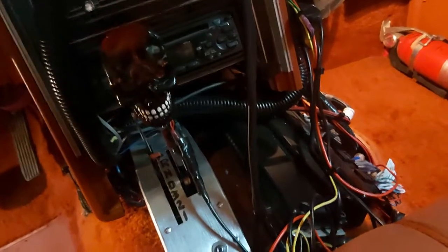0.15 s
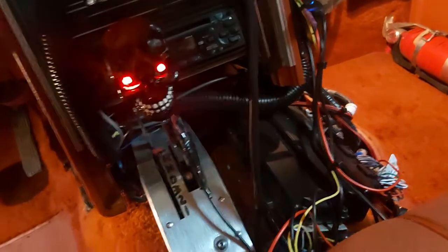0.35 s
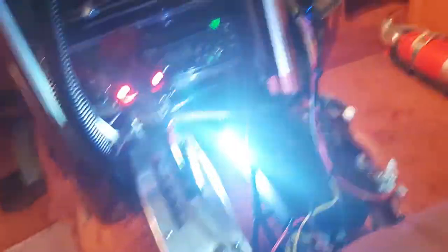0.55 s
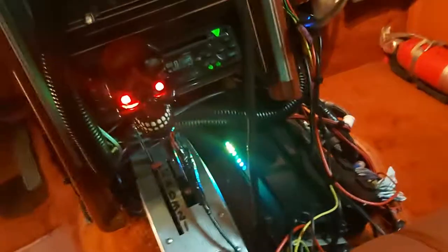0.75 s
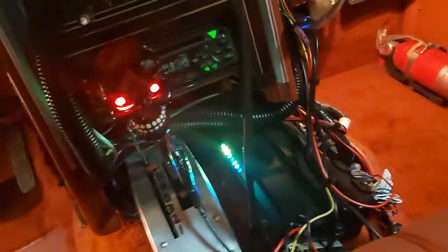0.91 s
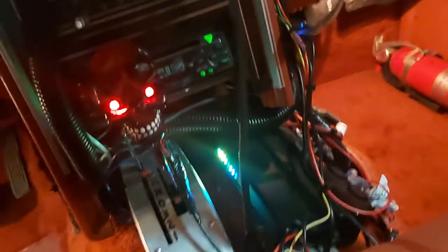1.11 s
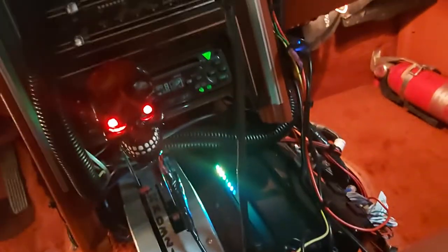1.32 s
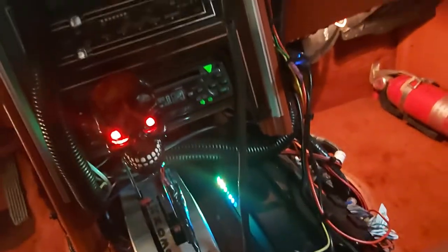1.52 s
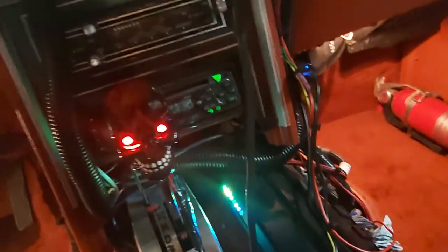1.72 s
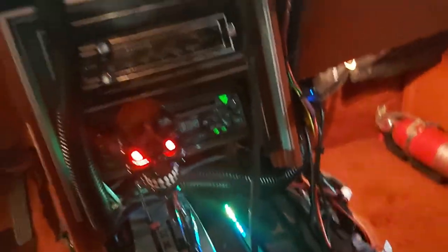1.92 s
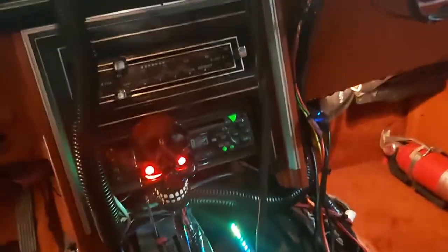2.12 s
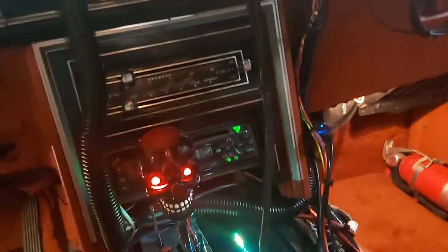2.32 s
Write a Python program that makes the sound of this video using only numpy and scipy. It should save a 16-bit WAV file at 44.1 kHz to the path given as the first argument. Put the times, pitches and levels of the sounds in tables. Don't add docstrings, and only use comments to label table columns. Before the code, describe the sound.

Electric fuel pumps running in a car cabin. Over faint air and a low outside drone, tiny lock clicks come at 0.2 s, a cluster of harder clicks and bright key jingle at 0.37-0.43 s. A relay snaps at 0.64 s; a low thump peaks near 0.72 s, then rough humming, whine and hiss hold steadily. A click at 0.87 s; clunks at 2.14 s, then quick run-down from about 2.2 s.

```python
import sys
import numpy as np
from scipy import signal
from scipy.fft import irfft
from scipy.io import wavfile
from scipy.ndimage import uniform_filter1d

SR = 44100
rng = np.random.default_rng(int(sys.argv[2]) if len(sys.argv) > 2 else 0)


def volts(x):
    e = np.asarray(x, float) / 20
    return 10 ** e


def output_pcm(signal):
    pcm = np.clip(np.atleast_2d(signal).T, -1, 1) * 32767
    wavfile.write(sys.argv[1], SR, np.round(pcm).astype(np.int16))


N = 103723

ON_S, HISS_OFF_S, OFF_S, RUN_DOWN_S = 0.645, 2.201, 2.266, 0.13
SLOW_PUMP_HZ, FAST_PUMP_HZ = 31.69, 40.38


def rms_one(x):
    return x / np.sqrt(np.mean(x ** 2) + 1e-20)


def at_hz(points, hz):
    table_hz, value = np.array(points)[:, 0], np.array(points)[:, 1]
    return np.interp(np.log(hz), np.log(table_hz), value)


def drift(rate):
    r = np.exp(-80 * np.pi * rate / SR)
    white = rng.standard_normal(N // 40 + 2002)
    slow = signal.lfilter([1], [1, -2 * r, r * r], white)[2000:]
    return np.interp(np.arange(N) / 40, np.arange(len(slow)), rms_one(slow))


def bump(t, at_s, spread_s):
    return np.exp(-((t - at_s) / spread_s) ** 2)


def resonance(x, hz, width):
    r = np.exp(-np.pi * width / SR)
    ring = [1, -2 * r * np.cos(2 * np.pi * hz / SR), r * r]
    return signal.lfilter(np.array([1, 0, -1]) * (1 - r * r) / 2, ring, x)


# pitch_hz, likeness (0-1)
LIKENESS = [(60, 0.81), (200, 0.89), (420, 0.61), (850, 0.54), (1800, 0.38), (3500, 0.16), (7000, 0),
            (12000, 1)]


def pair(one, other, hz):
    alike = np.clip(at_hz(LIKENESS, hz), 0, 1)
    late = np.roll(one, 19 if hz > 500 else 4)
    return np.sqrt(alike) * np.array([one, late]) + np.sqrt(1 - alike) * other


def banded_noise(spectrum, patchy_db):
    out, edges = 0, 25 * 2 ** np.arange(0, 9.5, 1 / 3)
    white = rng.standard_normal((2, 3, N))
    for k, (low, high) in enumerate(zip(edges, edges[1:])):
        hz = np.sqrt(low * high)
        if spectrum[0][0] / 1.3 < hz < spectrum[-1][0] * 1.3:
            band_filter = signal.butter(2, [low, high], "band", fs=SR, output="sos")
            bands = signal.sosfilt(band_filter, white[k % 2])
            level = volts(at_hz(spectrum, hz) + patchy_db * drift(36))
            out = out + level * pair(bands[0], bands[1:], hz)
    return rms_one(out)


def running(t, rise_s, off_s, fall_s):
    rise = 1 - np.exp(-np.maximum(t - ON_S, 0) / rise_s)
    return rise * np.exp(-np.maximum(t - off_s, 0) / fall_s)


def shaft(t, shaft_hz, wobble, lag, lag_s):
    starting = lag * np.exp(-np.abs(t - ON_S) / lag_s)
    slowed = 0.092 * np.maximum(t - OFF_S + 0.07, 0) / RUN_DOWN_S + starting
    return np.cumsum(shaft_hz * (1 - slowed + wobble * drift(5.05))) / SR


def pump_tones(turns, shaft_hz, orders):
    out, coasting_s = 0, np.maximum(np.arange(N) / SR - HISS_OFF_S + 0.03, 0)
    for k, db in zip(orders["count"], orders["db"]):
        unlike = 1 - np.clip(at_hz(LIKENESS, k * shaft_hz), 0, 1)
        lag = unlike * (0.3 + 0.06 * drift(3))
        phase = k * turns + rng.random()
        level = volts(db + 2 * drift(18) - 6 * k * coasting_s)
        out = out + level * np.sqrt(2) * np.sin(2 * np.pi * np.array([phase, phase - lag]))
    return out


# count (times the shaft speed), db (level_db)
SLOW_ORDERS = dict(count=[1, 2, 3, 4, 5, 6, 7, 12, 13, 16, 17, 18, 21, 26],
               db=[-6, -5.5, -3, -5.5, 1, -11, -17.5, -9.5, -15.5, -18, -19.5, -16.5, -24.5, -20])


def slow_pump(t):
    turns = shaft(t, SLOW_PUMP_HZ, wobble=0.001, lag=0.4, lag_s=0.1)
    level = volts(-39 + 5 * bump(t, at_s=2.176, spread_s=0.016))
    return level * pump_tones(turns, SLOW_PUMP_HZ, SLOW_ORDERS)


# count (times the shaft speed), db (level_db)
FAST_ORDERS = dict(count=[6, 7, 8, 9, 10, 12, 13, 18, 20, 21, 23, 24, 25, 30, 40, 41, 42, 45, 50, 55, 58, 60, 69, 70, 79, 80, 90, 100, 103, 111, 112, 119, 120],
               db=[-7.5, -1, -2, 0.5, 1.5, -4, -10, -13.5, -7.5, -9, -17.5, -32, -17.5, -13.5, -16.5, -16.5, -25, -19.5, -18.5, -29, -16, -21, -29, -12.5, -32, -16.5, -28, -17.5, -31, -20, -15, -20, -16.5])


def fast_pump(turns):
    return volts(-46) * pump_tones(turns, FAST_PUMP_HZ, FAST_ORDERS)


# pitch_hz, level_db (per Hz)
RUMBLE = [(15, -37), (25, 4.5), (157, -4), (231, -7.5), (376, -7), (613, -13.5), (803, -11), (904, -14.5),
          (1400, -34), (1820, -51), (3080, -120)]


def rumble_noise():
    return banded_noise(RUMBLE, patchy_db=-1.0)


# pitch_hz, level_db (per Hz)
HISS = [(1100, -5.5), (1460, -9.5), (1700, -8), (4800, -6), (5900, -16), (7700, -9.5), (8800, -23),
        (16000, -29)]


def flow_noise():
    return banded_noise(HISS, patchy_db=1.5)


def brushes(turns):
    k = np.arange(1, 513)
    level = volts(at_hz(HISS, k * FAST_PUMP_HZ) + 2.5 * rng.standard_normal((2, k.size))) * (k > 26)
    track = irfft(level * np.exp(2j * np.pi * rng.random((2, k.size))), 4096)
    scrape = [np.interp(turns % 1, np.linspace(0, 1, side.size), side) for side in track]
    return volts(-51.5) * rms_one(np.array(scrape))


def whistle(hiss):
    return volts(-66) * rms_one(resonance(resonance(hiss, 7440, 30), 7440, 30))


# time_s, level_db
JOLT = [
    (.65, -49),
    (0.675, -25),
    (0.699, -19),
    (0.726, -18.5),
    (.765, -27.5),
    (.785, -37),
    (.80, -36.5),
    (.86, -33.5),
    (.9, -60),
]
# pitch_hz, level_db
PAN = [(99.8, -2.5), (128.3, -9), (168, -17), (315.7, -22.5), (276, -25.5)]


def jolt(t):
    s, db = np.transpose(JOLT)
    fade_in, fade_out = np.clip((t - s[0]) / 0.011, 0, 1), np.clip((s[-1] - t) / 0.062, 0, 1)
    level = volts(np.interp(t, s, db)) * fade_in * fade_out
    return level * sum(np.sqrt(2) * volts(g) * np.sin(2 * np.pi * hz * (t - 0.7285)) for hz, g in PAN)


# pitch_hz, width_hz, level_db
BRACKETS = [(1690, 94, 2), (2060, 510, 3), (2640, 200, -12), (3970, 240, -3)]


def inrush_buzz(t, hiss):
    buzz = sum(volts(db) * rms_one(resonance(hiss, hz, width)) for hz, width, db in BRACKETS)
    return volts(-48) * buzz * bump(t, at_s=0.724, spread_s=0.061)


def stopping_shudder(t, rumble, hiss):
    shudder = volts(-39.5) * rms_one(resonance(rumble, 286, 140)) * bump(t, at_s=2.257, spread_s=0.083)
    settle = rms_one(resonance(rumble, 560, 150))
    settle = settle + volts(-8) * rms_one(resonance(hiss, 1800, 150))
    settle = settle + volts(-12) * rms_one(resonance(hiss, 1350, 150))
    return shudder + volts(-53) * settle * bump(t, at_s=2.29, spread_s=0.12)


# start_s, level_db, pitch_hz, t60_s (time to fall 60 dB), width (share of pitch)
CLICKS = [(0.2008, -48, 5200, 0.017, 0.7), (0.203, -46, 1310, 0.036, 0.48),
          (0.2666, -51.5, 1770, 0.024, 1.5), (.266, -55, 8900, 0.012, 1.3), (0.355, -64, 3970, 0.08, 1),
          (0.3685, -41, 3160, 0.092, 1.3), (0.381, -41.5, 4970, 0.047, 5.9), (.369, -40, 910, 0.042, 1.2),
          (0.3795, -39, 1300, 0.068, 1.7), (.3845, -37.5, 2980, 0.036, 1.2),
          (0.389, -37.5, 2480, 0.029, 0.98), (0.391, -42.5, 450, 0.07, 2.1), (.397, -59, 5000, 0.027, 2),
          (.411, -56, 9000, .06, 1), (0.419, -50, 11000, 0.06, 1), (0.427, -40.5, 9000, 0.053, 3.2),
          (0.474, -63, 5870, 0.029, 1.4), (0.5783, -57.5, 6450, 0.059, 1), (0.61, -63, 6940, 0.027, .3),
          (.628, -43, 1000, 0.12, 1.4), (.628, -45.5, 376, 0.22, 1), (0.6346, -45, 13400, 0.087, 0.31),
          (0.638, -34, 8040, 0.033, 2.3), (0.639, -36, 770, 0.11, 0.65), (.641, -36.5, 1900, 0.039, 2.2),
          (0.645, -46, 3500, 0.039, 1.2), (0.739, -49, 13000, 0.055, 0.86),
          (0.8677, -38, 10800, 0.037, 2.3), (2.138, -46, 6000, 0.12, 2.7), (2.136, -40.5, 1780, 0.094, .4),
          (2.143, -39, 2170, 0.1, 0.4), (2.141, -34, 734, 0.16, 0.51)]


def clicks():
    out, tail = np.zeros((2, N + SR)), np.arange(SR // 5) / SR
    for s, db, hz, t60, spread in CLICKS:
        white = rng.standard_normal((3, tail.size))
        ringing = resonance(resonance(white, hz, spread * hz), hz, spread * hz)
        burst = rms_one(ringing + volts(-45) * white)
        grain = np.repeat(rng.standard_normal(tail.size // 40 + 1), 40)[:tail.size]
        grain_db = 1.5 * uniform_filter1d(grain, size=30)
        crack_db = 5 * np.exp(-tail / 0.00091)
        cabin = volts(-29 - 60 * tail / 0.8)
        fall = volts(crack_db - 60 * tail / t60 + grain_db) + cabin
        rise = 1 - np.exp(-tail / 0.00048)
        start = int(s * SR)
        out[:, start:start + tail.size] += pair(burst[0], burst[1:], hz) * volts(db) * fall * rise
    return out[:, :N] * volts([[-1.25], [1.25]])


# pitch_hz, level_db, t60_s (time to fall 60 dB)
KEYS = [(4300, -10.5, 0.061), (6000, -20, .06), (7250, -5.5, 0.062), (8050, -13, 0.034), (9550, -12, 0.099),
        (10000, -12.5, 0.082), (12660, -8, .03), (14300, -5, 0.055), (14400, -16, 0.097), (15360, -16, .06),
        (15670, -22, .08)]
# pitch_hz, level_db, t60_s
BLADE = [(11430, 3, 0.03), (11000, -25, .08), (13800, 2, 0.039)]
# start_s, ring level_db, blade level_db, tilt (dB per octave)
TOUCHES = [(0.203, -62, -85, -16), (.399, -60, -72, 7), (.4115, -58, -75, 2), (.4190, -40, -48, 3),
           (0.4213, -52, -44, 5), (.4245, -43.5, -50, 3), (0.429, -46, -46, 7), (.431, -43, -47, 2),
           (.434, -55, -54, -7), (.472, -58, -72, -9), (0.578, -63, -74, -10), (.6102, -67, -79, 3),
           (0.6393, -41.5, -52, -4.5), (.642, -51, -54, -2), (0.74, -50, -60, 2), (.746, -50, -70, 2)]


def keys():
    s, ring_db, blade_db, tilt = np.transpose(TOUCHES)
    out = np.zeros((2, N))
    for modes, db in ((KEYS, ring_db), (BLADE, blade_db)):
        for hz, level_db, t60 in modes:
            hits = np.full((2, N), 1e-18)
            uneven_db = 2 * rng.standard_normal((len(s), 2)).T
            hits[:, (s * SR).astype(int)] = volts(db + level_db + tilt * np.log2(hz / 9000) + uneven_db)
            r, w = volts(-60 / (t60 * SR)), 2 * np.pi * hz / SR
            ring = [1, -2 * r * np.cos(w), r * r]
            left = signal.lfilter([0, np.sin(w)], ring, hits[0])
            right = signal.lfilter([1, -r * np.cos(w)], ring, hits[1])
            out += volts(3.5 * drift(150)) * np.array([left, right])
    return out


def rustle(t, hiss):
    soft = rms_one(resonance(hiss, 2500, 5400))
    return volts(-70 + 2 * drift(30)) * soft * bump(t, at_s=0.26, spread_s=0.056)


# pitch_hz, level_db, waver_db
DRONE = [(55.7, -51, -0.5), (164.4, -58.5, 5), (242, -59, 1.5), (385, -67, 2.5)]


def drone():
    out = 0
    for hz, db, waver_db in DRONE:
        phase = np.cumsum(hz * (1 + 0.01765 * drift(5.4))) / SR
        out = out + volts(db + waver_db * drift(6.3)) * np.sqrt(2) * np.sin(2 * np.pi * phase)
    return out


# pitch_hz, level_db (per Hz)
FLOOR = [(25, -19), (50, -4), (114, -17.5), (185, -10), (400, -21.5), (900, -27.5), (3300, -53),
         (16000, -63)]


def cabin_floor(hiss):
    whine = volts(-93) * rms_one(resonance(hiss, 4090, 300))
    return whine + volts(-50) * banded_noise(FLOOR, patchy_db=0.5)


def scene():
    t = np.arange(N) / SR
    sagging_hz = FAST_PUMP_HZ - 0.45 * (t - ON_S)
    fast_turns = shaft(t, sagging_hz, wobble=0.0004, lag=0.18, lag_s=0.06)
    hiss, rumble = flow_noise(), rumble_noise()
    pumps = slow_pump(t) + fast_pump(fast_turns) + volts(-39.5) * rumble
    pumps = pumps * running(t, rise_s=0.037, off_s=OFF_S, fall_s=RUN_DOWN_S)
    flow = volts(-49) * hiss + brushes(fast_turns) + whistle(hiss)
    flow = flow * running(t, rise_s=0.031, off_s=HISS_OFF_S, fall_s=0.099)
    start_and_stop = jolt(t) + inrush_buzz(t, hiss) + stopping_shudder(t, rumble, hiss)
    hand = clicks() + keys() + rustle(t, hiss)
    return pumps + flow + start_and_stop + hand + drone() + cabin_floor(hiss)


def low_pass(x):
    return signal.sosfilt(signal.butter(12, 16470, fs=SR, output="sos"), x)


def record(dry):
    cut = signal.sosfilt(signal.ellip(10, 0.5, 60, 15750, fs=SR, output="sos"), dry)
    cut = signal.sosfilt(signal.butter(2, 22, "high", fs=SR, output="sos"), cut)
    bass = signal.lfilter(*signal.butter(1, 45, fs=SR), cut)
    treble = signal.lfilter(*signal.butter(1, 5000, "high", fs=SR), cut)
    tilted = cut + bass * (volts([[-0.5], [0.5]]) - 1) + treble * (volts([[2.75], [-2.75]]) - 1)
    return low_pass(tilted * volts([[-0.87], [0.87]]))


dry = scene()
out = record(dry)
output_pcm(out)
```